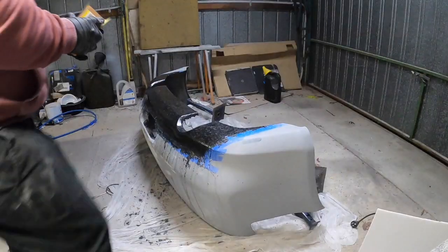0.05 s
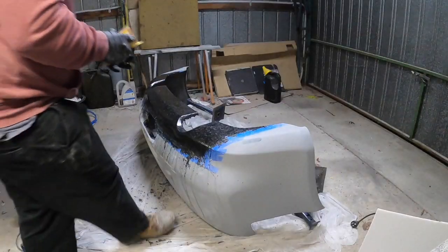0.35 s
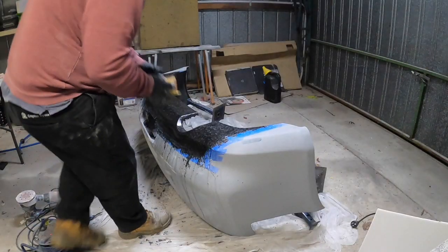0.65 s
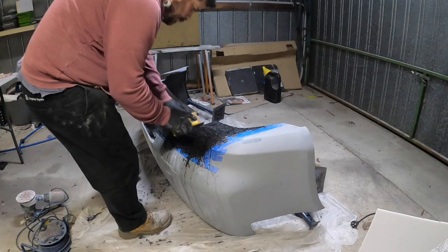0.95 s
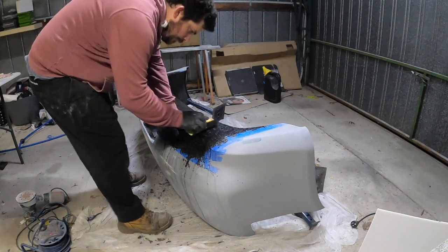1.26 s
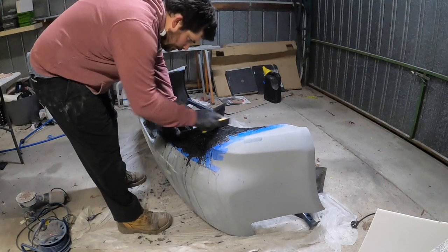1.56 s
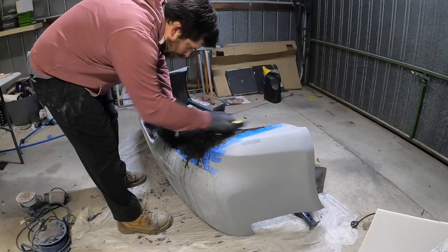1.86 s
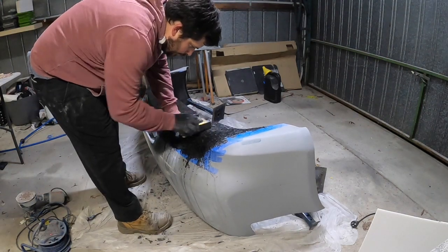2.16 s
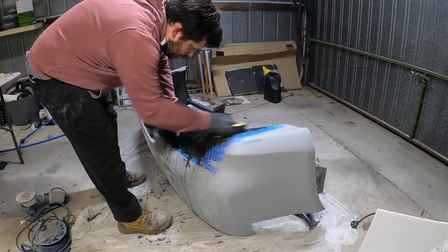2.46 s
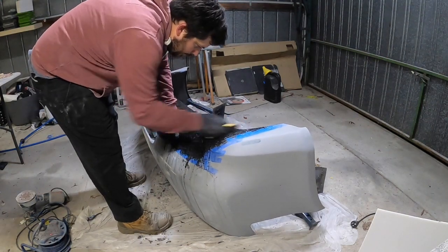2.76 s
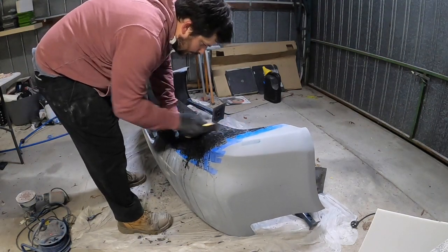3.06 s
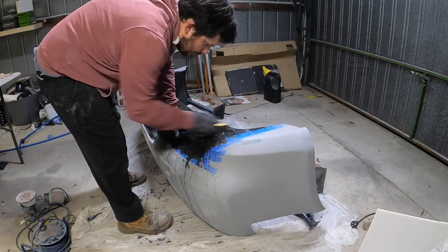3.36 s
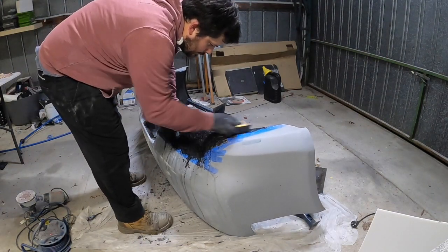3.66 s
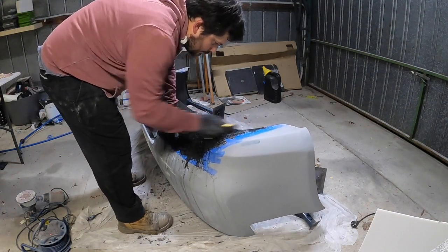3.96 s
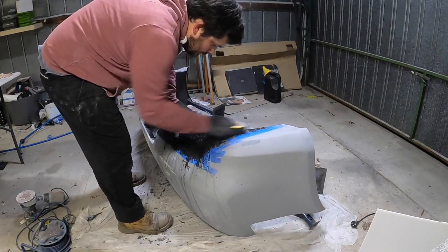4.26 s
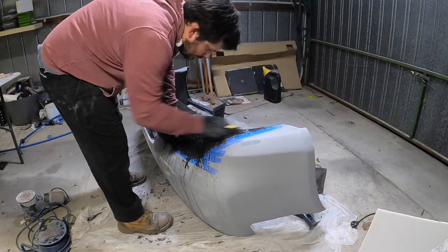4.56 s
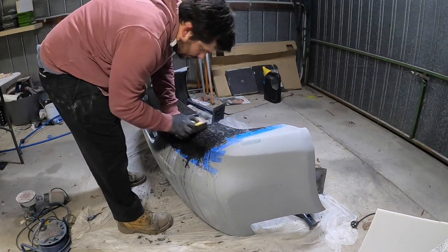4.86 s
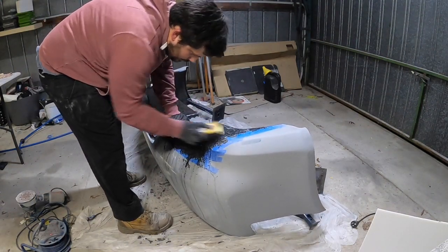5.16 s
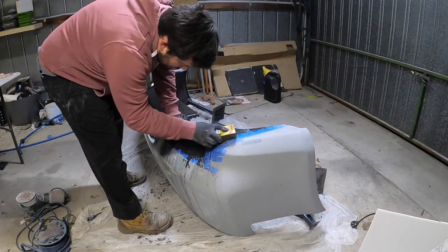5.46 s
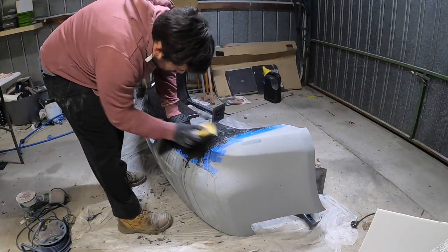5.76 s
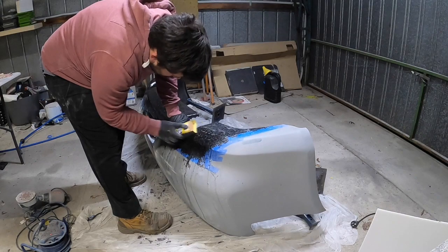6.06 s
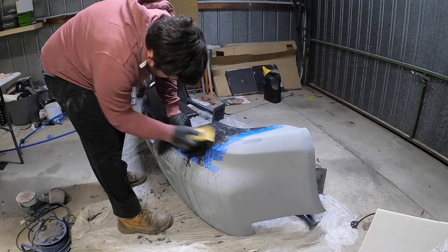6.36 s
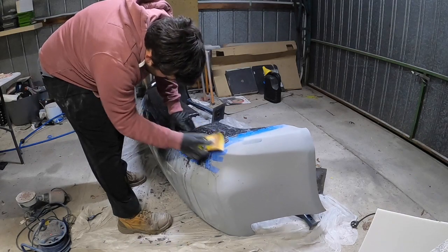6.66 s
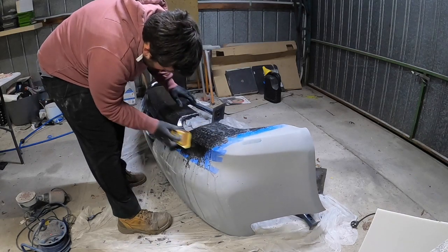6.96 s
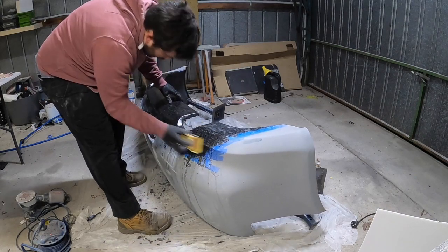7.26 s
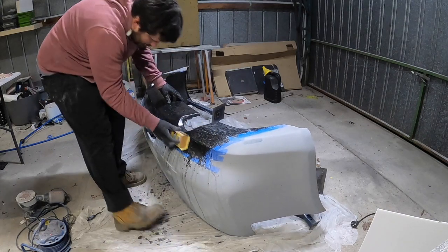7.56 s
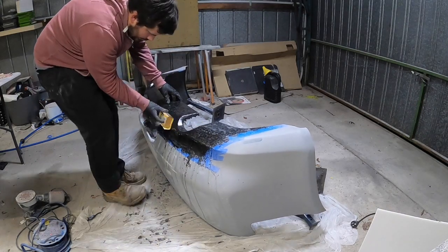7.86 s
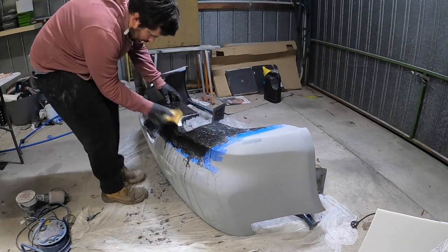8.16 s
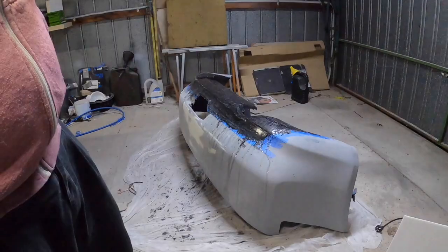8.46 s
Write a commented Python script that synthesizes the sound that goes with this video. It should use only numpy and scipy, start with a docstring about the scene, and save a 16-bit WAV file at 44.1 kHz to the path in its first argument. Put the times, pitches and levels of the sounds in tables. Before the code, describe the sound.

After a clothing rustle and a boot step, sandpaper rubs rapidly back and forth on a hollow plastic bumper.

```python
"""Sandpaper on a plastic car bumper: a man hand-sands a resin patch, about five strokes a second.
Close to the panel in a steel shed, we first hear him step up, with a rustle of clothes and a boot thud.
Then the grit hisses, the hollow shell drones and flexes under the pad, and his hands knock it now and then.
The microphone image starts in mono and opens into stereo as he works."""
import sys
import numpy as np
from scipy import signal
from scipy.fft import rfft, irfft, next_fast_len
from scipy.io import wavfile
from scipy.ndimage import uniform_filter1d, map_coordinates

SR = 44100
rng = np.random.default_rng(int(sys.argv[2]) if len(sys.argv) > 2 else 0)


def generate_wav(sig):
    """Save sig (samples, or channels by samples) to the path in sys.argv[1] as 16-bit PCM at SR."""
    pcm = np.round(np.clip(np.atleast_2d(sig).T, -1, 1) * 32767).astype(np.int16)
    wavfile.write(sys.argv[1], SR, pcm)


N = 379215
END_S = 8.478

# Strokes of the pad: start_s, hiss_db (mid-stroke), growth_db (start to end), arch_db (middle over ends),
# rasp_db, fizz_db (both against the hiss), drone_db
PAD_STROKES = [(1.281, -49, 18, 4, -4, -16, -66), (1.401, -42, 1, 3, -12.5, -13.5, -51.5),
               (1.61, -43.5, 4, 2.5, -13.5, -13, -53), (1.809, -42.5, 5.5, 2, -9.5, -11, -51.5),
               (2.06, -42, 1.5, 2, -14.5, -9.5, -55), (2.291, -42.5, 6.5, 0, -13, -13.5, -55.5),
               (2.518, -41.5, -5, 0, -13.5, -11.5, -56), (2.75, -44, 9, -3.5, -12.5, -13, -55),
               (2.954, -42, -1.5, -1.5, -14.5, -12.5, -52), (3.16, -44, 6, -4.5, -13, -13, -52),
               (3.35, -41.5, 2.5, -0.5, -14, -14.0, -54), (3.558, -43, 3.5, -3, -14, -14, -51.5),
               (3.749, -42, -1, 1, -16, -14, -50.5), (3.959, -42, 12.5, -0.5, -14, -13.5, -53),
               (4.239, -38.5, -5, 4.5, -15, -13.5, -51), (4.543, -44, 5, -2.0, -15.5, -15, -58),
               (4.757, -41, -8.5, -1, -17.5, -13.5, -46.5), (4.973, -46, 6, -3.0, -11, -18, -47),
               (5.166, -41, -4, 0.5, -10, -21.5, -50.5), (5.378, -44, 9, -1.5, -8, -16, -54.5),
               (5.578, -41.5, 1.5, 1.5, -9, -19.5, -53), (5.79, -40, 9.5, 2, -10, -17, -58),
               (5.988, -38, -3.5, 4.5, -10.5, -20, -56.5), (6.211, -40, 4.5, 3, -9, -19, -53.5),
               (6.418, -41.5, -2, 1, -9, -19, -49.5), (6.611, -39, 4, 6.5, -9, -21, -50.5),
               (6.854, -36.5, -2.5, 4.5, -9, -21, -52), (7.081, -41.5, 1, 1.5, -10.5, -16, -49),
               (7.295, -45, 2.5, 0, -8, -15, -44), (7.557, -45, -3.5, -0.5, -4, -23.5, -51),
               (7.76, -42, 1.5, 3.5, -8.5, -15.5, -47), (7.999, -37.5, 16, -0.5, -12.5, -32, -48),
               (8.26, -42, -8.5, -4.5, -9, -20.5, -55.5)]
# How alike left and right are at full width: frequency_hz, correlation
LIKENESS = [(120, .987), (175, .74), (235, .962), (450, .95), (900, .88), (2000, .78), (4000, .58),
            (7000, .33), (10000, .3), (13000, .25)]


def amp(db):
    """Decibels to gain."""
    return np.exp(np.asarray(db) * (np.log(10) / 20))


def unit(x):
    """x at rms 1."""
    return x / np.sqrt(np.mean(x ** 2) + 1e-20)


def along(points, hz):
    """(Hz, value) points read on a log axis."""
    f, v = np.transpose(points)
    return np.interp(np.log(hz + 1), np.log(f + 1), v)


def curves(rows):
    """One value per sample for each column after the time."""
    s, *cols = np.transpose(rows)
    return [np.interp(np.arange(N) / SR, s, c) for c in cols]


def wobble(rate):
    """A smooth random curve, rate knots a second."""
    return map_coordinates(rng.standard_normal(int(N * rate / SR) + 4), [np.arange(N) * rate / SR])


def filtered(x, response):
    """x times a response of frequency."""
    m = next_fast_len(x.shape[-1] + SR // 2)
    return irfft(rfft(x, m) * response(np.fft.rfftfreq(m, 1 / SR)), m)[..., :x.shape[-1]]


def add(track, s, sound):
    """Mix a sound into a track at time s."""
    part = track[..., round(s * SR):][..., :sound.shape[-1]]
    part += sound[..., :part.shape[-1]]


def fade_in(s):
    """0 before time s, 1 shortly after it."""
    return np.clip((np.arange(N) / SR - s) / 0.0067, 0, 1)


def eased(db):
    """Gain from dB, smoothed: the hand takes a moment to go from one stroke to the next."""
    return amp(uniform_filter1d(db, size=700))


def spread(pair):
    """Two unrelated signals as left and right: alike in the bass, less so in the treble."""
    mid, side = filtered(pair, lambda hz: np.sqrt((1 + np.outer([1, -1], along(LIKENESS, hz))) / 2))
    return np.array([mid + side, mid - side])


def rush(spectrum, grain=1):
    """Stereo noise of rms 1 with a given colour, its strength broken up by grain."""
    noise = spread(grain * rng.standard_normal((2, N)))
    return unit(filtered(noise, lambda hz: amp(along(spectrum, hz))))


def catches(rate, life_s, size_db, bed):
    """Strength of a scrape: grains catch at random and let go, over a bed of smooth sliding."""
    hits = (rng.random(N) < rate / SR) * amp(size_db * np.minimum(rng.exponential(size=N), 5)) ** 2
    power = signal.lfilter([1], [1, -np.exp(-1 / (life_s * SR))], hits)
    return np.sqrt(bed + power / power.mean())


def in_shed(x, wet_db):
    """A short sound with the diffuse answer of the steel walls."""
    # Decay of the shed: frequency_hz, t60_s
    decay = [(100, 0.25), (500, 0.34), (3000, 0.78), (12000, 0.43)]
    hz, t, z = signal.stft(spread(rng.standard_normal((2, SR // 2))), SR, nperseg=256)
    z = z * amp(-60 * t / along(decay, hz)[:, None]) * (1 - np.exp(-t / 0.0019))
    tail = signal.istft(z, SR, nperseg=256)[1]
    reverb = signal.fftconvolve(x[None], tail / np.linalg.norm(tail[0]), axes=1)[:, :len(x)]
    return x + amp(wet_db) * reverb


def still_air():
    """Room tone: the faint, low rush of the air in the shed."""
    # Colour of the air: frequency_hz, density_db
    colour = [(20, -34), (40, 0.5), (110, -9), (170, -13), (550, -27), (1500, -30.5), (7000, -36.5),
              (14000, -57)]
    return amp(-58.5) * rush(colour)


def approach():
    """Rustles, scuffs and thuds swell and die away before the sanding, and a boot lands on the floor."""
    # Rustles and thuds before sanding; the last is the first knock's dying tail:
    # peak_s, scuff_db, thud_db, t60_s
    rustles = [(.08, -56, -56, 0.71), (0.195, -53.5, -66, 0.93), (.26, -73, -58.5, 0.28),
               (.465, -57.5, -55, 0.22), (0.567, -42.5, -37, 0.57), (.68, -51.5, -68, 0.69),
               (.8, -78, -52.5, 0.34), (1.0, -78, -64, 0.28), (1.184, -48, -43, 0.45)]
    # Colour of the scuffs: frequency_hz, density_db
    scuff_colour = [(300, -9), (600, -3), (900, -4.5), (1500, 2), (2400, -1.5), (4000, -4.5), (7500, -10.5),
                    (10000, -20.5), (15000, -40)]
    # Colour of the thuds: frequency_hz, density_db
    thud_colour = [(20, -35), (45, -7), (85, 2.5), (150, -6.5), (300, -9.5), (400, -15), (700, -23.5),
                   (1500, -73)]
    # Boot on the concrete: start_s, peak_db
    steps = [(0.546, -29)]
    clock, t = np.arange(N) / SR, np.arange(SR // 2) / SR
    peak_s, scuff_db, thud_db, t60 = np.transpose(rustles)[..., None]
    rise_s = 0.22
    shape_db = -60 * np.maximum((peak_s - clock) / rise_s, (clock - peak_s) / t60)
    level = lambda db: np.linalg.norm(amp(db + shape_db), axis=0)
    scuff = rush(scuff_colour, catches(rate=2100, life_s=0.001, size_db=3.5, bed=1.0))
    out = level(scuff_db) * scuff + level(thud_db) * rush(thud_colour)
    for s, db in steps:
        thud = np.sin(2 * np.pi * 88 * t) * amp(-60 * t / 0.05)
        thud += 0.37 * np.sin(2 * np.pi * 260 * t) * amp(-60 * t / 0.15)
        add(out, s, in_shed(amp(db) * thud / abs(thud).max(), wet_db=-10))
    return out


def snaps():
    """Paper, glove and grit give brief, broad cracks that light up the shed."""
    # Dry snaps: start_s, peak_db, top_hz
    cracks = [(0.327, -44, 7040), (0.4695, -38.5, 3450), (.53, -44, 5000), (.559, -27, 7900),
              (1.128, -38, 9200), (1.165, -27, 3200), (1.324, -27.5, 5970), (3.763, -37, 6960),
              (4.851, -30, 8000)]
    out, t = np.zeros((2, N)), np.arange(SR // 2) / SR
    t60 = 0.011
    for s, db, top_hz in cracks:
        band = signal.butter(3, [1000, top_hz], "bandpass", fs=SR, output="sos")
        crack = signal.sosfilt(band, amp(-60 * t / t60) * rng.standard_normal(len(t)))
        add(out, s, in_shed(amp(db) * crack / abs(crack).max(), wet_db=-3.5))
    return out


def shell_ring(t, scatter_db, damping):
    """The bumper's answer to one push; mode strengths scatter, as with where the push lands."""
    # Modes of the shell: pitch_hz, level_db, t60_s
    modes = [(142.2, -12, 0.64), (182, -11, 0.48), (199, -8.5, 0.2), (246.4, 2.5, 0.22), (277, -7, 0.17),
             (323.8, -1.5, 0.18), (365, -6.5, 0.38), (411, 1.5, 0.05), (469, -5.5, 0.13),
             (561, -18.5, 0.16), (596, -6.5, 0.2), (780, -26.5, 0.24), (843, -24, .18), (1170, -8, 0.11)]
    ring = np.zeros(len(t))
    for k, (hz, db, t60) in enumerate(modes):
        level_db = db + scatter_db * rng.normal() - 60 * damping * t / t60
        ring += (-1) ** k * amp(level_db) * np.sin(2 * np.pi * hz * t)
    return ring


def knocks():
    """Gloved hands and the pad bump the shell: a dense boom around its modes, duller for soft contact."""
    # Blows on the shell: start_s, peak_db, low_cut_hz, contact_brightness_hz, t60_s
    blows = [(1.162, -30.5, 266, 567, 0.15), (1.325, -39, 260, 910, 0.28), (4.851, -18.5, 150, 926, 0.3),
             (7.319, -42.5, 150, 500, 0.15), (8.138, -29, 270, 503, 0.26)]
    out, t = np.zeros((2, N)), np.arange(SR // 2) / SR
    free_t60 = 0.32  # a shorter boom is damped by the hand
    for s, db, low_hz, contact_hz, t60 in blows:
        blow = shell_ring(t, scatter_db=1.0, damping=free_t60 / t60)
        blow += 4.0 * amp(-60 * t / t60) * rng.standard_normal(len(t))
        blow = signal.sosfilt(signal.butter(4, contact_hz, fs=SR, output="sos"), blow)
        blow = signal.sosfilt(signal.butter(3, low_hz, "highpass", fs=SR, output="sos"), blow)
        add(out, s, in_shed(amp(db) * blow / abs(blow).max(), wet_db=-6.0))
    return out


def pad_motion():
    """Stroke progress, nearness to a turn and the bite after it (each 0-1), then the stroke's levels."""
    pickup_s, brake_s, bite_s = 0.016, 0.015, 0.03
    starts, *levels = np.transpose(PAD_STROKES)
    t, turns = np.arange(N) / SR, np.append(starts, END_S)
    which = np.clip(np.searchsorted(turns, t) - 1, 0, len(starts) - 1)
    since, until = np.maximum(t - turns[which], 0), np.maximum(turns[which + 1] - t, 0)
    turning = np.maximum(np.exp(-(since / pickup_s) ** 4), np.exp(-until / brake_s))
    bite = (since / bite_s * np.exp(1 - since / bite_s)) ** 2
    return [since / (since + until), turning, bite] + [db[which] for db in levels]


def note(hz, waver):
    """A mode of rms 1 whose pitch wavers under the moving hand."""
    return unit(np.sin(2 * np.pi * hz * np.arange(N) / SR + waver * wobble(22)))


def shell_drone():
    """Friction keeps the shell's modes droning; now and then they swell around one hollow note."""
    # Friction force: frequency_hz, level_db
    colour = [(25, -20.5), (56, 10.5), (110, -5), (145, 4), (200, -5.5), (250, -2), (320, -2.5),
              (450, -3.5), (600, -5.5), (800, -15.5), (1300, -20.5), (4000, -71.5)]
    # The drone thins as the pad moves along the panel: time_s, bass_db
    thinning = [(3.2, 4), (6.0, -1)]
    # Hollow notes swell in the shell, under the pad or ringing on after a knock:
    # peak_s, level_db, pitch_hz
    hollow_notes = [(1.21, -45, 290), (1.455, -49, 250), (1.835, -42, 330), (1.885, -39, 240),
                    (2.54, -46.5, 255), (2.815, -47, 255), (2.995, -46.5, 255), (3.372, -46.5, 250),
                    (3.575, -49.5, 400), (3.775, -49, 250), (4.9, -31, 245), (5.55, -48, 340),
                    (5.93, -46.5, 400), (6.04, -49, 340), (6.43, -44.5, 340), (7.04, -42.5, 250),
                    (7.42, -40.5, 295), (8.16, -38.5, 410), (8.21, -39, 291)]
    bass_hz, turn_dip_db, swell_s, other_modes_db = 252, 2, 0.038, -1.5
    _, turning, *_, drone_db = pad_motion()
    t = np.arange(N) / SR
    ring = shell_ring(t[:SR // 2], scatter_db=1.8, damping=0.87)
    friction = rush(colour, catches(rate=130, life_s=0.0078, size_db=3.5, bed=0.14))
    drone = unit(signal.fftconvolve(friction, ring[None], axes=1)[:, :N])
    drone += amp(-2.0) * rush(colour)  # the pad's own dull scrubbing
    swing = np.sqrt(abs(uniform_filter1d(drone[0] ** 2, size=2000)) + 0.086)
    drone = unit(drone / swing)  # chatter keeps an even swing
    bass = filtered(drone, lambda hz: 1 / (1 + (hz / bass_hz) ** 10))
    drone += (amp(curves(thinning)[0]) - 1) * bass
    power, notes = eased(drone_db - turn_dip_db * turning) ** 2, np.zeros(N)
    for s, db, hz in hollow_notes:
        age = np.clip(1 + (t - s) / swell_s, 0, 20)
        swell = amp(db) * (age * np.exp(1 - age)) ** 2 / np.sqrt(2)
        notes += swell * note(hz, waver=0.87)
        power += (amp(other_modes_db) * swell) ** 2
    return fade_in(PAD_STROKES[0][0]) * np.sqrt(power) * drone + notes


def panel_ripple(x, ripple_db):
    """Crowded high modes of the panel put a fine, steady ripple on the scrape's colour."""
    t = np.arange(SR // 16) / SR
    ring = amp(-60 * t / .06) * rng.standard_normal(len(t))
    ringing = signal.fftconvolve(x, ring[None] / np.linalg.norm(ring), axes=1)[:, :N]
    return unit(x + amp(ripple_db) * ringing)


def wandering(x, depth_db):
    """The colour shifts as the pad moves over different parts of the panel."""
    z = signal.stft(x, nperseg=512)[2]
    field = uniform_filter1d(rng.standard_normal(z.shape[1:]), size=4, axis=0)
    field = uniform_filter1d(field, size=12, axis=1)
    return signal.istft(z * amp(depth_db * unit(field)), nperseg=512)[1][:, :N]


def sanding():
    """Grit ploughs the resin: rasp, hiss and fizz, duller and weaker as the pad slows to turn."""
    # Scrape of the grit: frequency_hz, density_db
    colour = [(350, -1.5), (600, -10), (850, -12), (1050, -5.5), (1600, -5), (2100, -6), (2600, -4),
              (3600, -0.3), (4800, -2.2), (6000, -5.5), (7500, -8), (10000, -17), (12500, -17.5),
              (15600, -25)]
    # The hand leans harder or lets up within a stroke: middle_s, change_db
    surges = [(1.70, 2), (2.575, -3), (3.31, 1.5), (4.105, 2), (4.345, 5), (4.72, 6), (4.80, -0.5),
              (5.04, -1.5), (5.12, 5.5), (5.935, 3.5), (6.675, 2), (6.885, -0.5), (7.42, 4.5), (7.65, -1.5),
              (7.70, 3), (8.08, 4), (8.21, -8), (8.275, -5.5), (8.33, 4)]
    slow_rasp_db, slow_fizz_db, surge_s = 4.5, -10, 0.052
    turn_dip_db, bite_db = 8.5, 2.5  # the grit digs in as the pad restarts
    progress, turning, bite, hiss_db, growth_db, arch_db, rasp_db, fizz_db, _ = pad_motion()
    t = np.arange(N) / SR
    slow = (1 - np.sin(np.pi * progress)) ** 2
    grains = catches(rate=3500, life_s=.0005, size_db=2.7, bed=1.1)
    scrape = panel_ripple(rush(colour, grains), ripple_db=-17)
    below = lambda hz, edge_hz: 1 / (1 + (hz / edge_hz) ** 8)
    rasp = unit(filtered(scrape, lambda hz: below(hz, edge_hz=2370)))
    hiss = unit(filtered(scrape, lambda hz: below(hz, edge_hz=11500) - below(hz, edge_hz=1846)))
    fizz = unit(filtered(scrape, lambda hz: 1 - below(hz, edge_hz=8650)))
    rasp *= eased(rasp_db + slow_rasp_db * slow + 1.2 * wobble(25))
    fizz *= eased(fizz_db + slow_fizz_db * slow)
    surge_db = sum(db * np.exp(-((t - s) / surge_s) ** 2) for s, db in surges)
    force = eased(hiss_db + growth_db * (progress - .5) - arch_db * (2 * progress - 1) ** 2 + surge_db)
    flutter_db = 0.21 * wobble(61) + 0.27 * wobble(23)  # ridges in the resin make the pressure flutter
    force *= amp(flutter_db - turn_dip_db * turning + bite_db * bite)
    return fade_in(PAD_STROKES[0][0]) * force * wandering(rasp + hiss + fizz, depth_db=1.4)


def heaves():
    """The whole bumper rocks on its stand under a hard push: deep, short throbs."""
    # Hard pushes: middle_s, level_db, length_s
    pushes = [(1.452, -41.5, .055), (1.683, -42, 0.075), (1.87, -43.5, 0.15), (2.113, -46.5, 0.058),
              (2.39, -43.5, .16), (2.817, -40, 0.11), (2.965, -42, 0.031), (3.226, -42, 0.096),
              (3.44, -42.5, 0.1), (3.62, -41.5, 0.11), (3.765, -39, 0.067), (4.307, -46, 0.14),
              (4.785, -42, 0.035), (4.925, -39, 0.11), (5.628, -45.5, 0.056), (6.054, -44.5, 0.088),
              (6.448, -45.5, 0.091), (7.047, -46, 0.082), (7.79, -44, 0.11), (8.227, -44, 0.055)]
    # Rumble of the stand: frequency_hz, density_db
    rumble_colour = [(15, -23.5), (55, -6), (95, 4), (400, -61)]
    t = np.arange(N) / SR
    push = sum(amp(db) / (1 + (2 * (t - s) / length) ** 4) for s, db, length in pushes)
    return push * unit(note(hz=56.3, waver=0.35) + amp(-8) * rush(rumble_colour))


def screeches():
    """The paper bites harder for an instant and gives a narrow screech."""
    # Snags of the paper: middle_s, level_db, pitch_hz
    snags = [(1.986, -43, 3120), (5.131, -44, 3010)]
    out, swell = np.zeros((2, N)), np.hanning(SR // 16)
    for s, db, hz in snags:
        noise = spread(rng.standard_normal((2, len(swell))))
        screech = filtered(noise, lambda f: 1 / (1 + ((f - hz) / 450) ** 2))
        add(out, s - len(swell) / SR / 2, amp(db) * swell * unit(screech))
    return out


def opening(x):
    """The image widens from mono to stereo at constant loudness, the middle band last."""
    # Stereo width, full at 0 dB and above: time_s, bass_db, middle_db, treble_db
    widths = [(1.2, -45, -47, -42), (2.4, -10, -69, -58), (3.0, -10, -53, -2.5), (4.0, -1.5, -17, 3),
              (5.0, -2, -9, 0), (5.9, -3, -1, 0)]
    # Tops of those three bands, above which the image is always wide: top_hz
    band_tops = [1400, 5500, 11000]
    hz, t, (mid, side) = signal.stft(np.array([x[0] + x[1], x[0] - x[1]]) / 2, SR, nperseg=512)
    s, *bands = np.transpose(widths)
    width_db = np.array([np.interp(t, s, band) for band in bands] + [np.zeros(len(t))])
    width = amp(np.minimum(width_db[np.searchsorted(band_tops, hz)], 0))
    alike = along(LIKENESS, hz)[:, None]
    mid = mid * np.sqrt(1 + (1 - width ** 2) * (1 - alike) / (1 + alike))
    return signal.istft(np.array([mid + width * side, mid - width * side]), SR, nperseg=512)[1][:, :N]


def scene():
    """The work drifts a little off centre; the shell and the air of the shed stay centred."""
    # Where the pad works: time_s, left_over_right_db, left_lag_samples
    place = [(2.5, -.1, 0), (4.3, .1, .4), (6, .9, .9), (8.4, 1.1, 1.1)]
    # Balance of the work across the treble: frequency_hz, left_over_right_db
    tilt = [(1400, 0), (2900, 1), (5300, 0.3), (9300, -0.5), (13000, -4.5)]
    pan_db, lag = curves(place)
    sides = np.array([[.5], [-.5]])
    work = sanding() + screeches() + snaps() + approach()
    left, right = filtered(work, lambda hz: amp(sides * along(tilt, hz)))
    left = map_coordinates(left, [np.arange(N) - lag], order=3)
    return np.array([left, right]) * amp(sides * pan_db) + shell_drone() + heaves() + knocks() + still_air()


def record(dry):
    """The microphone image opens out; the top treble is cut and the sound stops abruptly at the end."""
    running = np.clip((END_S - np.arange(N) / SR) / .004, 0, 1)
    return filtered(opening(dry) * running, lambda hz: hz < 15700)


dry = scene()
out = record(dry)
generate_wav(out)
```